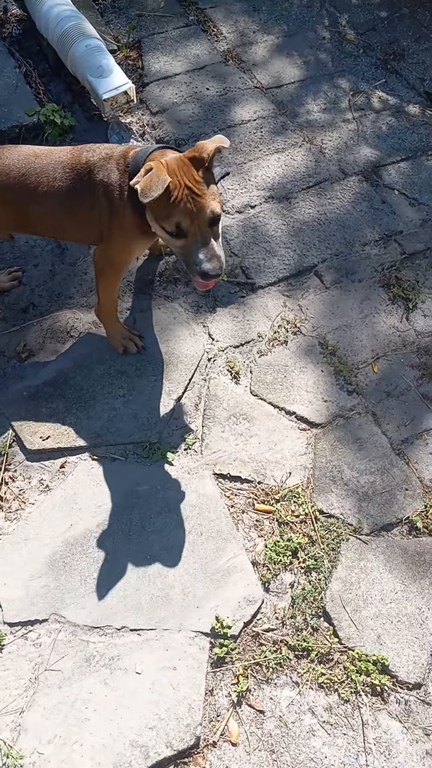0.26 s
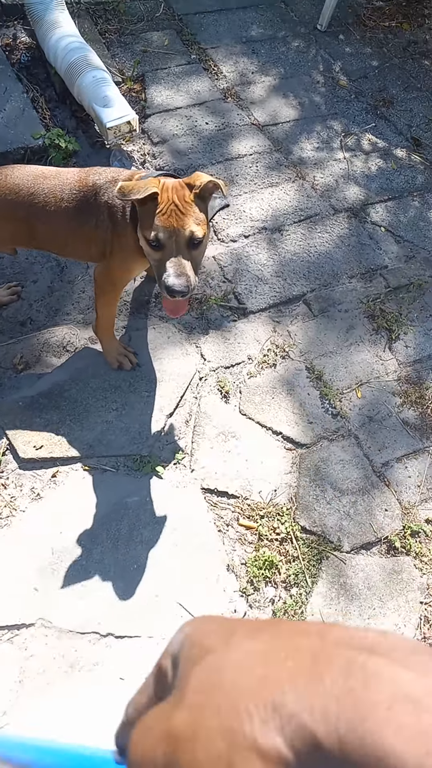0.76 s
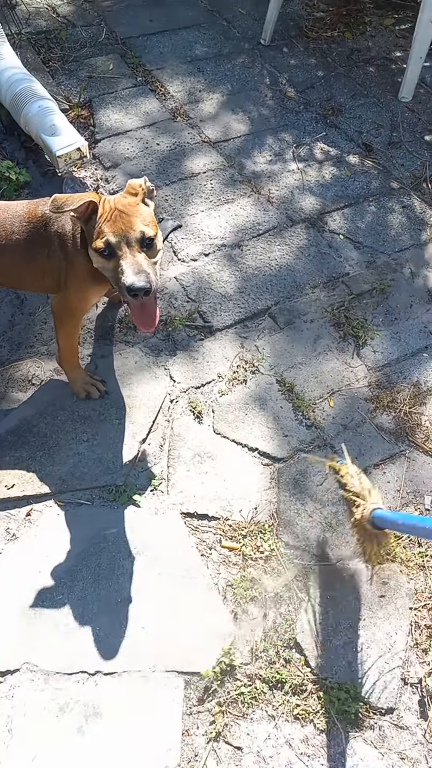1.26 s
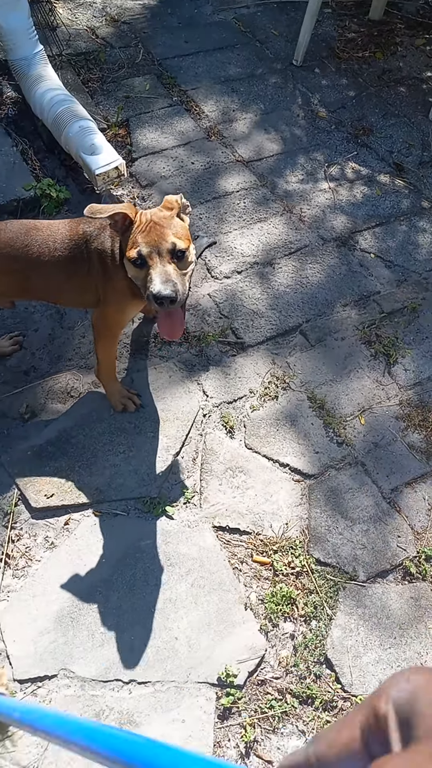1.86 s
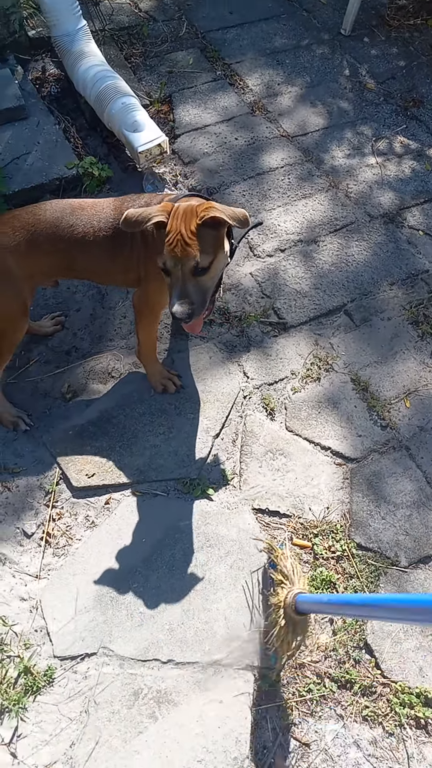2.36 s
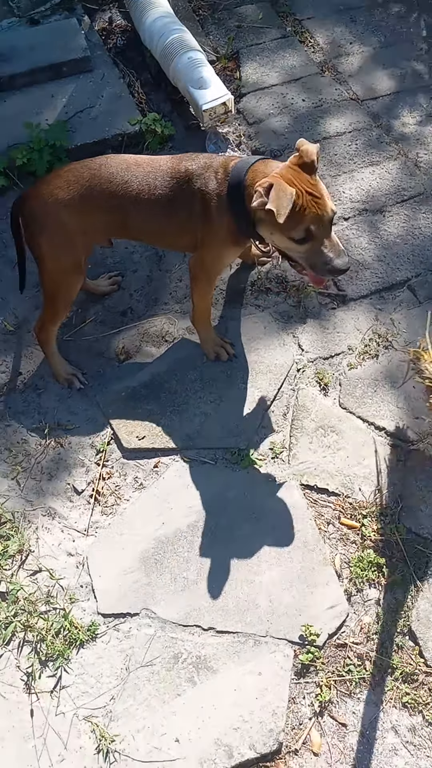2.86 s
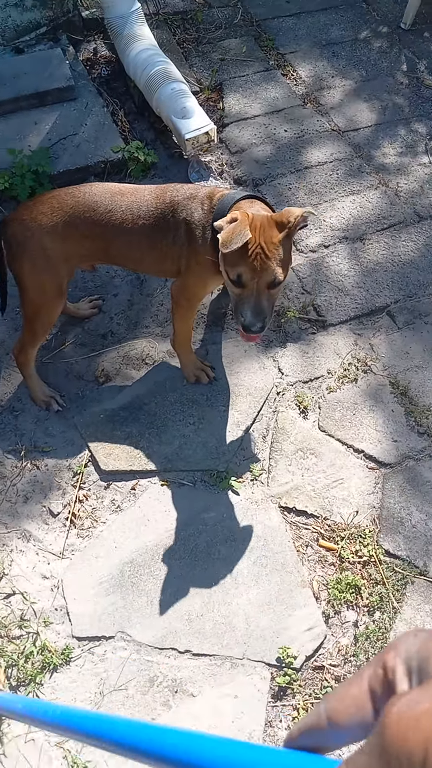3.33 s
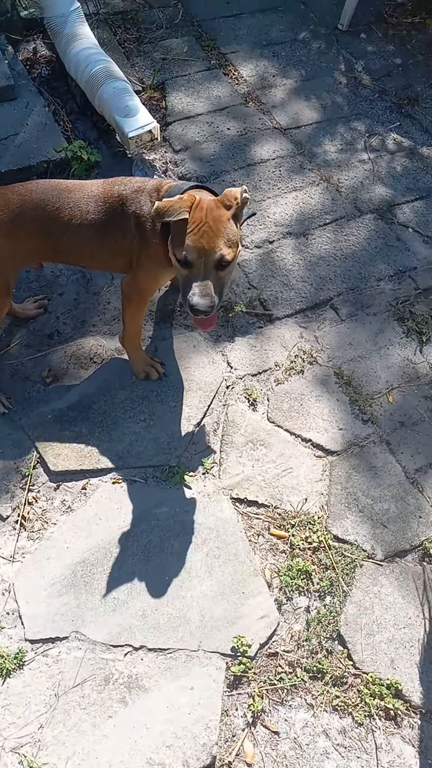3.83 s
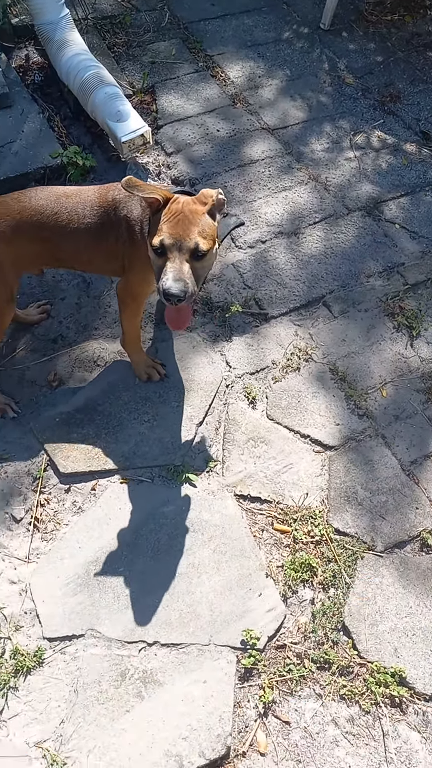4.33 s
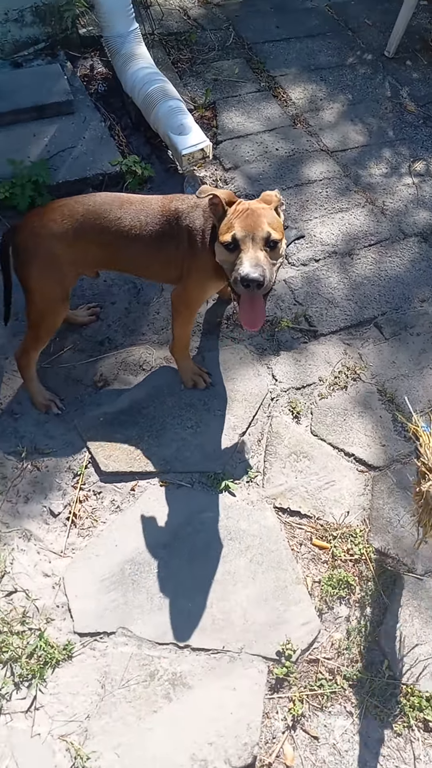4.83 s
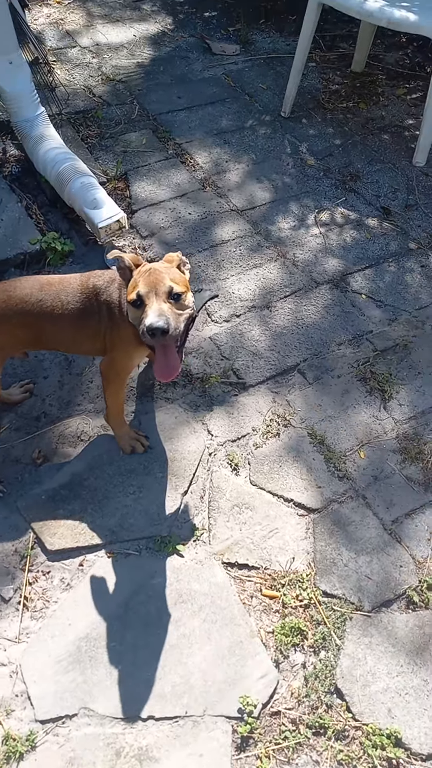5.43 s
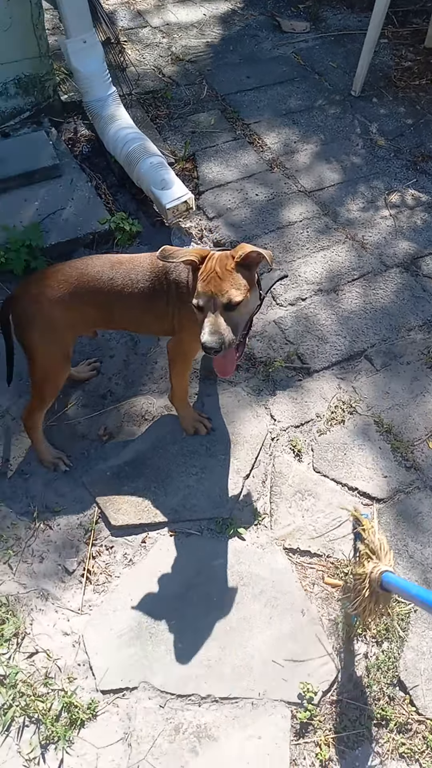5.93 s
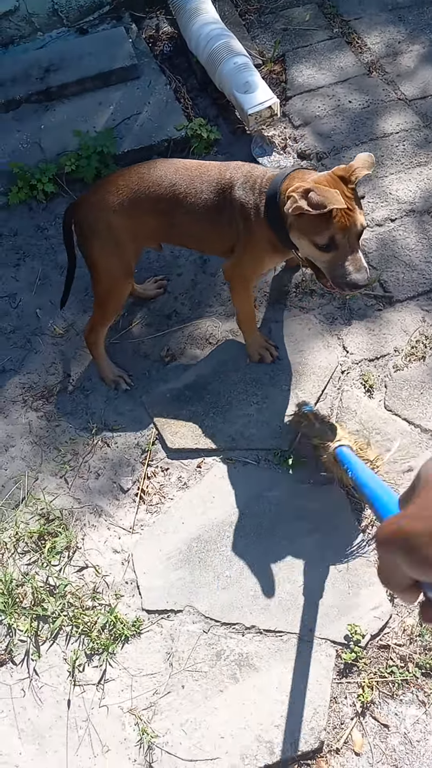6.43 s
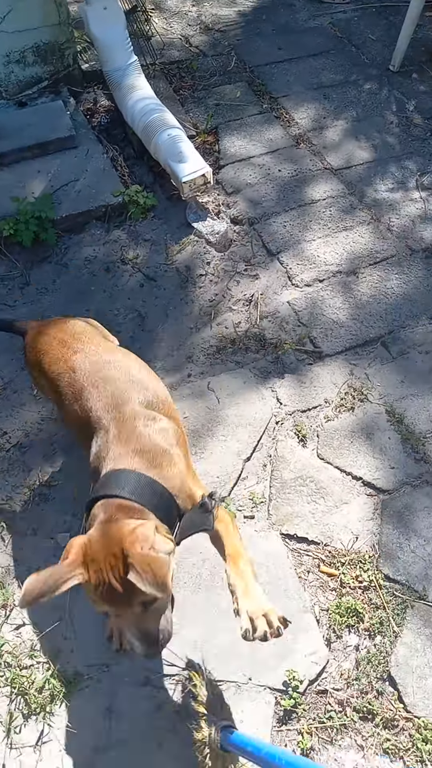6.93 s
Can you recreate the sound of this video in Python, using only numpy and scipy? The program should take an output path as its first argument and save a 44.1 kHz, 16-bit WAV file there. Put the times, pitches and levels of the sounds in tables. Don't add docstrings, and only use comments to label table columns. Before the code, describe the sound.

A stiff broom scrapes paving stones in short, bright strokes while small birds whistle, a vehicle drones past, and a dog finally pounces with skidding claws.

```python
import sys
import numpy as np
from scipy import signal
from scipy.fft import rfft, irfft, next_fast_len
from scipy.io import wavfile
from scipy.ndimage import uniform_filter1d

SR = 44100
rng = np.random.default_rng(int(sys.argv[2]) if len(sys.argv) > 2 else 0)


def materialize(psi):
    bounded = np.clip(np.atleast_2d(psi).T, -1, 1)
    quanta = np.round(bounded * 32767).astype(np.int16)
    wavfile.write(sys.argv[1], SR, quanta)


def amplitude_ratio(level_db):
    exponent = np.asarray(level_db, float) / 20
    return 10 ** exponent


N = 317079
T = np.arange(N) / SR
FAST = next_fast_len(N)
HZ = np.fft.rfftfreq(FAST, 1 / SR)


def along(points):
    p = np.array(points, float)
    return np.interp(np.log(HZ + 1), np.log(p[:, 0]), p[:, 1])


def shape(x, gain):
    return irfft(rfft(x, FAST) * gain, FAST)[..., :N]


def colour(x, points):
    y = shape(x, amplitude_ratio(along(points)))
    return y / np.sqrt(np.mean(y ** 2))


def curve(rows, col):
    rows = np.array(rows, float)
    return np.interp(T, rows[:, 0], rows[:, col])


def walk(rate):
    hold = int(SR / rate)
    steps = np.repeat(rng.standard_normal(N // hold + 1), hold)
    return 1.24 * uniform_filter1d(uniform_filter1d(steps, hold), hold)[:N]


# (frequency [Hz], common share [0-1])
LIKENESS = [(60, 0.99), (250, 1), (640, 0.57), (1300, 0.45), (2400, 0.25), (4000, 0.043), (8000, 0.085)]


def pair(make, lag_s):
    like = np.clip(along(LIKENESS), 0, 1)
    common = make()
    ports = []
    for lag in (0, lag_s):
        shared = shape(common, np.sqrt(like) * np.exp(-2j * np.pi * HZ * lag))
        ports.append(shared + shape(make(), np.sqrt(1 - like)))
    return np.array(ports)


def patchy(points, lag_s, flicker_db):
    noise = colour(pair(lambda: rng.standard_normal(N), lag_s), points)
    spectrum = rfft(noise, FAST)
    octave = np.round(np.log2(HZ + 1))
    low, high = np.round(np.log2([points[0][0], points[-1][0]])).astype(int)
    out = np.zeros((2, N))
    for k in range(low, high + 1):
        out += irfft(spectrum * (octave == k), FAST)[:, :N] * amplitude_ratio(flicker_db * walk(6))
    return out


def hum():
    phase = 2 * np.pi * 122 * T
    note = walk(14) * np.sin(phase) + walk(13) * np.cos(phase)
    return note * amplitude_ratio(curve([(0, -59), (4.6, -59), (5.2, -49), (7.19, -48)], 1))


# (time [s], tyre roar level [dB], engine effort [dB])
ROAD = [(0, -55, -0.5), (.3, -58, -2), (.8, -54, -0.5), (1.3, -52, 1.5), (1.7, -49, 0.5), (2.3, -44.5, 2.5),
        (2.52, -43, 1.5), (2.68, -45, -1), (2.76, -47.5, 1), (2.95, -47.5, 4.5), (3.2, -46.5, 1),
        (3.44, -46.5, -2), (3.72, -44, -3.5), (4.2, -55.5, 1), (4.5, -58, -1.5), (5.5, -59.5, 1.5),
        (6.1, -62, 0.5), (7.19, -59, 0.5)]
# (time [s], rumble level [dB])
LORRIES = [(0, -37.5), (.9, -34.5), (1.6, -36.5), (2.35, -30.5), (3.2, -34.5), (4.25, -41.5), (5.0, -40.5),
           (6.3, -38.5), (7.19, -38)]
# (frequency [Hz], level [dB per Hz])
RUMBLE = [(25, -14), (43, -23), (59, 2), (80, 12), (110, 1), (150, -8.5), (200, -43)]
ROAR = [(110, -26), (150, 0.5), (205, -0.5), (265, -5.5), (320, -6), (390, -12.5), (500, -19), (600, -29)]
TYRES = [(380, -59), (480, -10.5), (610, -5.5), (830, 1.5), (1120, -3.5), (1860, -14), (2600, -19),
         (4500, -33.5), (6500, -43), (9000, -40), (16000, -75)]
TREAD = [(400, -71.5), (520, -27), (600, -2), (750, 0.5), (950, -2), (1100, -28.5), (1500, -90.5)]
AIR = [(900, 0.5), (1500, 2.5), (2700, -10), (4500, -18), (6000, -63), (9000, -48), (16000, -66)]


def road():
    tyre_db = curve(ROAD, 1)
    busy_db = tyre_db + 59.5
    load_db = np.maximum(curve(VEHICLE, 1) + 40, 0)
    rumble = patchy(RUMBLE, 0.00049, 2.8) * amplitude_ratio(curve(LORRIES, 1))
    roar = patchy(ROAR, 0.00034, 1.18) * amplitude_ratio(0.53 * busy_db + 0.27 * load_db + curve(ROAD, 2) - 51)
    tyres = patchy(TYRES, 0.00038, 1.94) * amplitude_ratio(tyre_db - 0.083 * busy_db + 4.5)
    tread = patchy(TREAD, 0.00037, 2.5) * amplitude_ratio(1.65 * busy_db - 72)
    rustle = patchy(AIR, .0004, 1.0) * amplitude_ratio(-55.5)
    return rumble + roar + tyres + tread + rustle


# (time [s], exhaust drone level [dB], body boom level [dB])
VEHICLE = [(1.4, -39, -55), (1.6, -41.5, -50.5), (1.9, -27, -46), (2.1, -30.5, -40.5), (2.25, -30.5, -51),
           (2.5, -34, -51), (2.65, -34.5, -46), (2.9, -29, -55), (3.3, -28, -48), (3.55, -28, -40),
           (3.68, -31.5, -48), (3.81, -32, -38.5), (4.0, -42.5, -60), (4.17, -49, -49), (4.45, -56, -58)]


def vehicle():
    approach_hz, retreat_hz, passes_s, spread_s = 68.7, 59.3, 3.05, 0.55
    body_hz = 327.7
    on = np.clip(np.minimum(T - VEHICLE[0][0], VEHICLE[-1][0] - T) / 0.15, 0, 1)
    ahead = (1 - np.tanh((T - passes_s) / spread_s)) / 2
    firing_hz = retreat_hz + (approach_hz - retreat_hz) * ahead
    phase = 2 * np.pi * np.cumsum(firing_hz * (1 + 0.0091 * walk(12))) / SR
    drone = np.sin(phase) + amplitude_ratio(-20.0) * np.sin(2 * phase)
    drone *= amplitude_ratio(curve(VEHICLE, 1) + 2 + 1.2 * walk(7.64))
    ring = 2 * np.pi * np.cumsum(body_hz - 6 * (T - 2)) / SR
    body_db = curve(VEHICLE, 2)
    body = (walk(35) * np.sin(ring) + walk(35) * np.cos(ring)) * amplitude_ratio(body_db)
    body += walk(60) * np.sin(1.87 * ring) * amplitude_ratio(body_db - 13)
    left = drone + body
    return on * np.array([left, np.roll(left, 20)])


# (time [s], length [s], start pitch [Hz], end pitch [Hz], level [dB])
SLURS = [(3.2, 0.04, 4150, 3150, -51), (2.695, 0.02, 4000, 3060, -44.5), (3.155, 0.034, 4520, 4475, -49),
         (5.498, 0.021, 3550, 3540, -49), (5.521, 0.025, 4750, 4620, -53), (5.548, 0.029, 4400, 4290, -47),
         (6.114, 0.015, 2920, 2990, -52), (6.979, 0.038, 3644, 3697, -39), (7.173, 0.017, 3500, 3820, -47)]
# (share of length [0-1], share of glide [0-1], level [dB])
SLUR_SHAPE = [(0, 0, -4), (.5, .5, 0), (1, 1, -3)]
# (time [s], pitch [Hz], level [dB])
DROPS = [
    [(.387, 4500, -64), (.403, 3980, -57), (.413, 3070, -58), (.428, 3050, -63)],
    [(.438, 4200, -56), (.448, 4950, -60)],
    [(.452, 4540, -51), (.475, 3900, -56), (.485, 3420, -65)],
    [(.788, 3950, -53.5), (.81, 3175, -50), (.827, 3250, -54)],
    [(.844, 4800, -58), (.855, 3870, -45), (.863, 3600, -56), (.878, 3270, -62)],
    [(.985, 3500, -47), (1.0, 3480, -53), (1.01, 3260, -59), (1.04, 3230, -58)],
    [(1.495, 3480, -53), (1.507, 3250, -47), (1.515, 2890, -49), (1.54, 2800, -49), (1.55, 2470, -56)],
    [(1.562, 4650, -54), (1.572, 3950, -45.5), (1.582, 3930, -49)],
    [(1.66, 3430, -55), (1.68, 3030, -50.5), (1.72, 3100, -51)],
    [(1.739, 4860, -54), (1.745, 4310, -44.5), (1.765, 4220, -50)],
    [(1.885, 3910, -46), (1.9, 3290, -45), (1.91, 3000, -41), (1.93, 3110, -49.5)],
    [(1.947, 4320, -48), (1.958, 3830, -44.5), (1.975, 3745, -51)],
]
# (time [s], pitch [Hz], level [dB])
MORE_DROPS = [
    [(2.392, 3650, -54), (2.42, 3270, -43.5), (2.445, 3160, -50.5), (2.47, 2930, -57)],
    [(2.522, 4250, -51), (2.54, 3900, -43), (2.565, 3410, -45.5), (2.59, 3190, -49), (2.62, 2900, -47.5)],
    [(2.72, 3850, -51), (2.733, 2910, -45), (2.745, 2950, -50), (2.765, 2830, -47)],
    [(3.33, 3900, -52), (3.355, 3850, -49), (3.385, 3550, -51), (3.413, 3400, -54)],
    [(3.408, 3050, -52), (3.421, 2980, -46), (3.438, 2850, -56)],
    [(3.478, 3850, -52), (3.5, 4000, -53), (3.51, 3840, -47), (3.52, 3700, -52)],
    [(6.117, 3900, -59), (6.132, 3990, -55.5), (6.155, 3770, -49), (6.178, 3750, -53)],
]
# (time [s], pitch [Hz], level [dB])
PHRASES = [
    [(4.268, 4700, -63), (4.295, 3935, -60), (4.33, 3650, -60), (4.355, 3750, -58), (4.366, 3780, -68),
     (4.377, 3810, -53), (4.41, 3750, -53.5), (4.433, 3750, -61)],
    [(4.447, 3850, -54), (4.475, 4060, -47), (4.495, 4390, -57), (4.52, 4410, -59), (4.53, 4350, -66),
     (4.56, 4450, -63), (4.605, 4420, -62)],
    [(5.572, 3650, -50), (5.588, 2650, -38), (5.6, 2560, -36.5), (5.625, 2450, -44.5), (5.66, 2550, -48),
     (5.673, 2560, -63), (5.7, 2620, -45.5), (5.73, 3230, -53.5)],
    [(5.722, 3900, -55), (5.75, 4150, -47), (5.765, 4190, -50), (5.79, 4250, -52), (5.8, 3850, -41),
     (5.815, 2760, -42.5), (5.822, 2580, -35.5), (5.832, 2550, -46)],
    [(6.175, 3350, -52), (6.197, 2610, -36), (6.21, 2454, -39.5), (6.222, 2443, -46), (6.24, 2417, -41),
     (6.3, 2450, -43.5), (6.325, 2685, -39), (6.34, 2850, -46), (6.362, 3520, -58)],
    [(6.33, 3600, -55), (6.35, 4130, -54), (6.375, 4440, -57), (6.4, 4340, -51.5), (6.42, 4520, -52),
     (6.445, 4760, -55), (6.485, 3990, -48)],
    [(7.03, 3050, -44), (7.045, 2646, -35), (7.07, 2520, -45.5), (7.085, 2480, -48), (7.1, 2550, -55),
     (7.125, 2640, -46.5), (7.15, 2684, -44), (7.175, 2740, -44), (7.189, 3050, -60)],
]


def notes():
    slurs = []
    for s, length, hz0, hz1, db in SLURS:
        slurs.append([(s + length * u, hz0 + (hz1 - hz0) * glide, db + d) for u, glide, d in SLUR_SHAPE])
    return slurs + DROPS + MORE_DROPS + PHRASES


# (delay [s], level [dB])
ECHOES = [
    (.0005, -5),
    (.07, -18),
    (.092, -24),
]
# (time [s], level [dB])
DISTANCE = [(0, -32), (.55, -33), (.75, -38), (1.2, -38), (2.2, -40), (3.0, -38), (3.6, -40), (4.6, -35),
            (5.4, -37), (6.6, -38), (7.19, -42)]
# (frequency [Hz], level [dB])
LEAVES = [(2500, -6.5), (3100, 1.5), (4500, 3.5)]


def birds():
    song, waver = np.zeros(N), 1 + .014 * walk(150)
    for note in notes():
        s, hz, db = np.transpose(note)
        a, b = int((s[0] - .004) * SR), min(int((s[-1] + 0.0072) * SR), N)
        t = T[a:b]
        pitch = np.interp(t, s, hz) * waver[a:b]
        phase = 2 * np.pi * np.cumsum(pitch) / SR
        octave = amplitude_ratio(-22) * np.exp(-((pitch - 4050) / 420) ** 2)
        fade = np.clip(np.minimum(t - t[0], s[-1] + .006 - t) / .006, 0, 1)
        whistle = np.sin(phase) + octave * np.sin(2 * phase)
        song[a:b] += whistle * fade * amplitude_ratio(np.interp(t, s, db) + 3.5)
    song *= amplitude_ratio(2.4 * walk(130))
    t, out = T[:SR], []
    for lag in range(2):
        decay = np.exp(-np.log(1000) * t / .55)
        trees = rng.standard_normal(SR) * decay * (1 - np.exp(-t / .008))
        walls = np.zeros(SR // 4)
        walls[lag] = .6
        for s, db in ECHOES:
            walls[int(s * SR):int(s * SR) + 400] = amplitude_ratio(db - 26) * rng.standard_normal(400)
        scattered = shape(song, amplitude_ratio(along(LEAVES))) * amplitude_ratio(curve(DISTANCE, 1))
        stirred = np.interp(T + .0003 * walk(90), T, scattered)
        out.append(signal.fftconvolve(song, walls)[:N] + signal.fftconvolve(stirred, trees)[:N])
    return np.array(out)


def taps(events, ring_s, crack, gain_db):
    length = 4000
    out, t = np.zeros((2, N + length)), T[:length]
    for s, db, hz, pan_db in events:
        noise = np.diff(rng.standard_normal((2, length + 1)), axis=1)
        ring = np.sin(2 * np.pi * hz * t) * np.exp(-t / ring_s)
        blow = ring + crack * noise * np.exp(-3 * t / ring_s)
        start = int(s * SR)
        out[:, start:start + length] += blow * amplitude_ratio(db + gain_db + np.array([[pan_db], [-pan_db]]) / 4)
    return out[:, :N]


# (time [s], level [dB])
SCUFF = [
    (6.78, -70),
    (6.814, -59),
    (7.068, -49),
    (7.076, -58),
    (7.19, -51),
]
# (frequency [Hz], level [dB per Hz])
PAWS = [(150, -18), (300, -3), (700, 2.5), (1200, -3), (2400, 0.5), (4500, -20), (8000, -33)]


def scuff():
    def scratches():
        force = amplitude_ratio(4 * np.minimum(rng.exponential(1, N), 4))
        return (rng.random(N) < .07) * rng.choice([-1, 1], N) * force
    on = T > SCUFF[0][0]
    return on * colour(pair(scratches, 0.00023), PAWS) * amplitude_ratio(curve(SCUFF, 1) + 4.3 * walk(70) + 1.0)


# (time [s], peak level [dB], ring pitch [Hz], twice left minus right [dB])
KNOCKS = [(6.811, -44, 4100, -3), (6.849, -40.5, 1740, -1), (6.959, -44, 2400, 3), (6.991, -43, 966, -2.0),
          (7.035, -51, 1220, -1), (7.052, -34.5, 1160, -3), (7.065, -46, 902, -2.0)]
# (time [s], peak level [dB], ring pitch [Hz], twice left minus right [dB])
THUDS = [
    (5.106, -32, 194, -11),
    (6.991, -28, 273, 1),
    (7.044, -38, 213, -5.5),
    (7.134, -33, 220, -3.5),
]


def dog():
    return taps(KNOCKS, 0.0023, 0.18, 1.0) + taps(THUDS, 0.006, 0.013, 1.0) + scuff()


# (time [s], peak level [dB], ring pitch [Hz], twice left minus right [dB])
GRIT = [(0.2329, -59, 7800, -0.5), (0.8874, -50, 10950, 3.5), (0.9358, -57, 7490, 0.0),
        (1.2464, -43, 8820, -2), (1.2564, -50, 10400, 2.0), (1.287, -45, 12000, 0.0),
        (1.4494, -50, 10800, 1.5), (1.5933, -45, 14000, 5), (2.274, -52, 10000, 1),
        (2.4594, -58, 6710, 1.0), (2.5081, -47, 11830, 2.0), (3.1434, -52, 5880, 7),
        (3.1497, -47, 11600, 5.5), (3.1624, -38.5, 12300, 18), (3.437, -50, 11000, 1),
        (3.4745, -44, 11000, 1), (3.695, -56, 12000, 1), (3.755, -57, 11500, 1), (3.805, -59, 14000, 1),
        (4.255, -54, 13000, 1), (4.826, -57, 11000, 1), (5.1951, -65, 7980, 1.0),
        (5.4194, -63, 11520, -2.5), (5.9944, -60, 11200, 1.0), (6.6474, -56, 5000, -3),
        (6.7074, -50, 12200, 1.0), (6.7594, -60, 6990, 0.5), (6.821, -36, 12100, 5),
        (6.9147, -47, 9980, -1.0), (6.9456, -41, 6590, 1.5)]
# (time [s], peak level [dB], ring pitch [Hz], twice left minus right [dB])
SNAPS = [
    (5.9195, -33, 2900, -30),
    (6.81, -45, 2400, -11),
    (7.1334, -43, 2650, -11),
    (1.247, -43, 6000, 0),
]


def grit():
    return taps(GRIT, 0.00056, .7, 1.7) + taps(SNAPS, 0.00038, 0.47, 1.8)


def stroke(since, push, length):
    touch_db, lift_db, roundness = -11.5, -11.5, 1.97
    land_db_s, leave_db_s = 1300, 700
    from_push = np.abs(np.interp(since, [0, push, length], [-1, 0, 1]))
    swell = np.where(since < push, touch_db, lift_db) * from_push ** roundness
    return swell - land_db_s * np.maximum(-since, 0) - leave_db_s * np.maximum(since - length, 0)


# (touch-down time [s], time to hardest push [s], contact length [s], tip hiss level [dB],
# stalk scrape minus hiss [dB])
STROKES = [(-.06, 0.06, 0.13, -39, -6.5), (0.605, 0.036, 0.15, -40, -5), (1.081, 0.072, 0.125, -42.5, -9.5),
           (2.322, 0.035, 0.095, -40, -9.5), (2.968, 0.062, 0.12, -39, -7.5),
           (3.478, 0.046, 0.12, -41, -4.5), (4.158, 0.051, 0.073, -48, -8),
           (4.642, 0.033, 0.1, -38.5, -7.5), (5.253, 0.067, 0.14, -43, -7.5),
           (5.784, 0.014, 0.12, -41, -10), (6.422, 0.067, 0.17, -44, -4.5),
           (6.814, 0.0063, 0.036, -54.5, 1), (6.908, 0.0087, 0.017, -58.5, 3),
           (6.938, 0.0087, 0.073, -50.5, 0), (6.999, 0.044, 0.09, -50, -5), (7.12, .015, .07, -57.5, -4)]
# (time [s], level [dB], fading [dB per s])
DEBRIS = [(.1, -64, 148), (.59, -68, 300), (.79, -65, 69), (1.22, -62, 37), (1.6, -69, 101),
          (2.26, -69.5, 20), (2.45, -65.5, 40), (3.11, -58, 87), (3.62, -67, 66), (4.245, -66.5, 86),
          (4.571, -75, 24), (4.77, -70.5, 73), (5.409, -66, 190), (5.771, -63, 106), (5.93, -69, 206),
          (5.99, -71, 73), (6.61, -68, 26)]


def contact():
    stalk_lag_s, debris_rise_db_s, debris_press_db = 0.0042, 400, -4.5
    tips, stalks = np.zeros(N), np.zeros(N)
    for s, push, length, db, press_db in STROKES:
        near = slice(max(int((s - .1) * SR), 0), int((s + .5) * SR))
        since = T[near] - s
        tips[near] += amplitude_ratio(db + stroke(since, push, length))
        stalks[near] += amplitude_ratio(db + press_db + stroke(since - stalk_lag_s, push, length))
    for s, db, fade_db in DEBRIS:
        gain = amplitude_ratio(db - np.maximum(fade_db * (T - s), debris_rise_db_s * (s - T)))
        tips += gain
        stalks += gain * amplitude_ratio(debris_press_db)
    return tips, stalks


# (frequency [Hz], level [dB per Hz])
TIPS = [(6000, -14), (8500, -7.5), (11400, -1.5), (14900, -3), (16500, -14.5)]
STALKS = [(500, -6.5), (1100, -9), (2000, -3.5), (3600, 0), (5300, -6), (7000, -4), (8700, -11),
          (11000, -29)]


def broom():
    def slips():
        force = amplitude_ratio(2 * np.minimum(rng.exponential(1, N), 3.5))
        return (rng.random(N) < .3) * rng.choice([-1, 1], N) * force
    tip, stalk = contact()
    rough_db = 1.4 * walk(60)
    tips = colour(pair(slips, .0001), TIPS) * tip * amplitude_ratio(rough_db + 0.5)
    stalks = colour(pair(slips, .0001), STALKS) * stalk * amplitude_ratio(rough_db + 0.36 * walk(90) + 3.5)
    return tips + stalks


def scene():
    return hum() + road() + vehicle() + birds() + dog() + grit() + broom()


# (frequency [Hz], left minus right [dB])
PORTS = [(60, -1.5), (110, -3), (200, -2), (380, -6), (700, 0), (1290, -4), (2380, -8.5), (4400, -3.5),
         (8120, -1.5), (15000, 6)]


def top_cut(x):
    return signal.sosfilt(signal.butter(12, 16390, fs=SR, output="sos"), x)


def record(dry):
    tilt = along(PORTS) / 2
    top = np.clip((15900 - HZ) / 150, 0, 1)
    responses = irfft(top * amplitude_ratio(np.array([tilt, -tilt])), FAST)
    ports = np.roll(responses, 1024, axis=1)[:, :2049] * np.hanning(2049)
    padded = np.pad(dry, ((0, 0), (1024, 1024)), "reflect")
    heard = signal.fftconvolve(padded, ports, "valid", axes=1)
    return top_cut(heard)


dry = scene()
out = record(dry)
materialize(out)
```